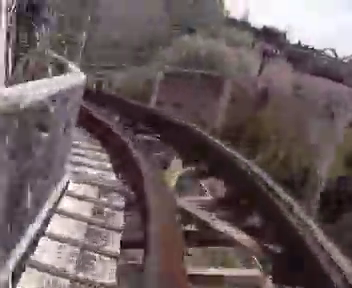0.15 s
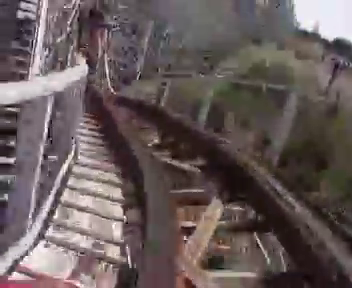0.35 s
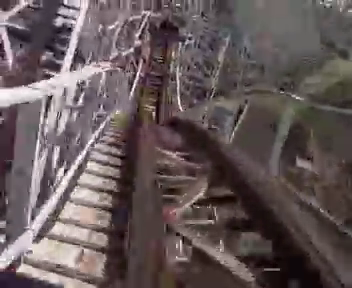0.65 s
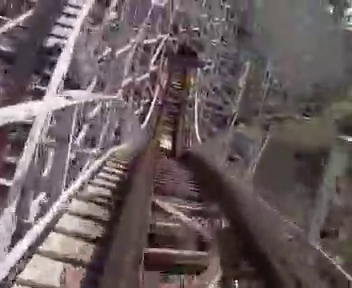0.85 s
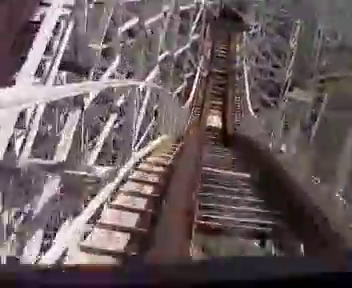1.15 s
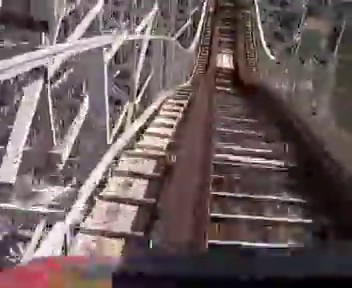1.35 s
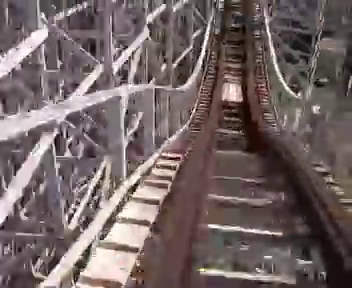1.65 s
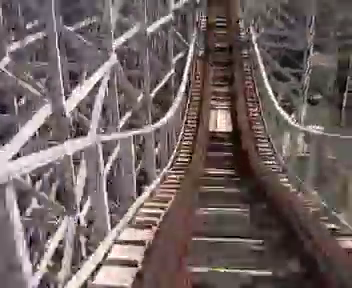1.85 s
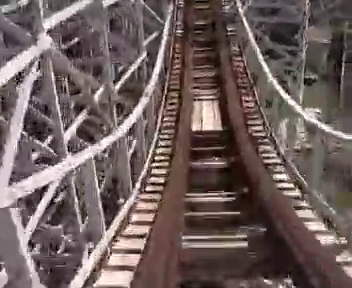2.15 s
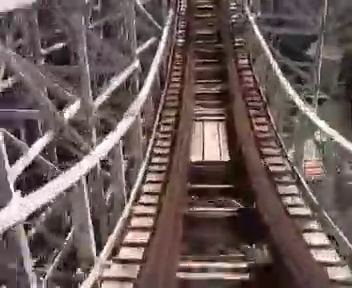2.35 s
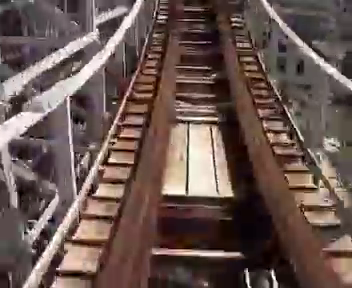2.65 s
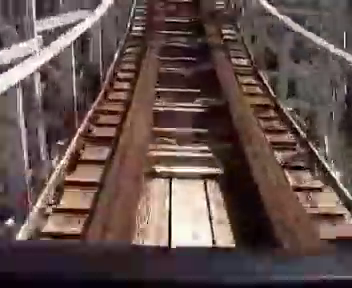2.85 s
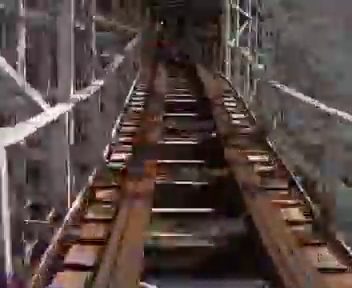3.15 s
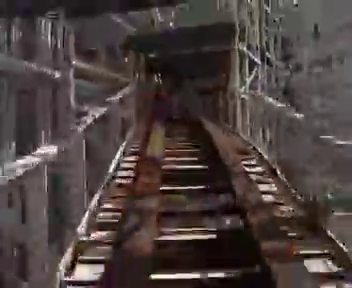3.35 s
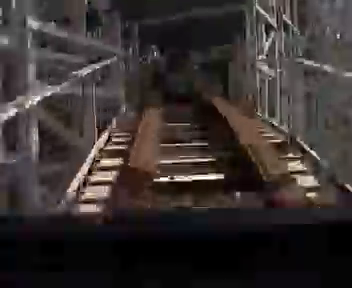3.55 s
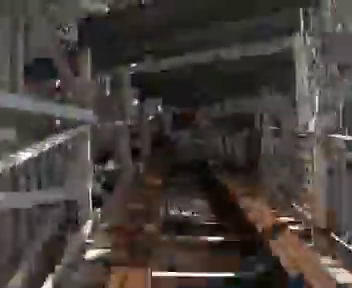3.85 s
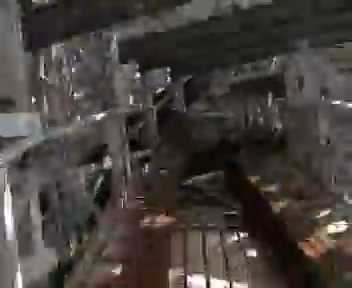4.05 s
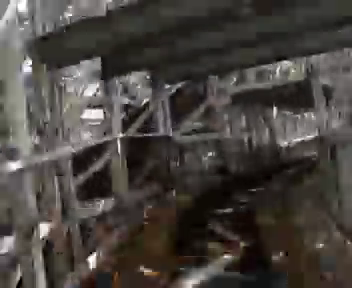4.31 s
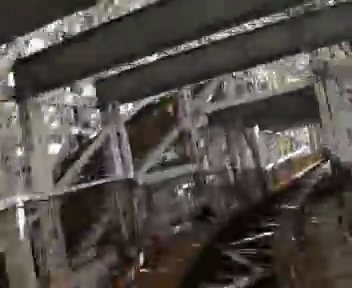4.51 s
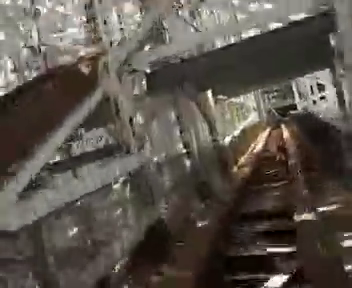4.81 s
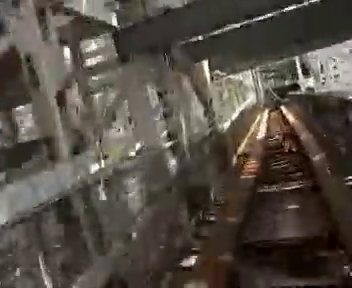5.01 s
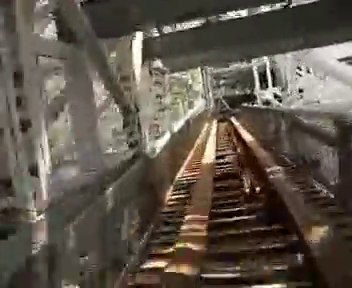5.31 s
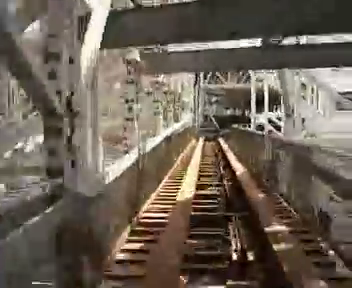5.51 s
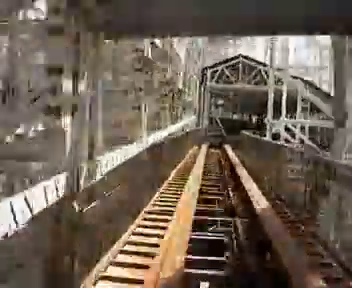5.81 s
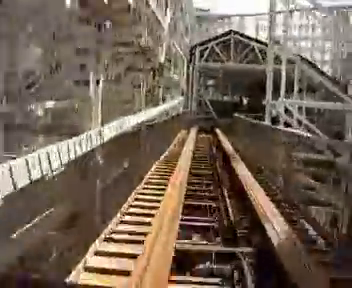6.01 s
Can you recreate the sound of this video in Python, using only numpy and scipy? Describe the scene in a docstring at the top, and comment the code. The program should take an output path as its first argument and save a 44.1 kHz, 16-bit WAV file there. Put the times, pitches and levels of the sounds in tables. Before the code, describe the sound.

A wooden roller coaster heard from the front seat: loud rumbling, dense rattling and hard clacks, then wind slaps and a ringing steel wheel.

```python
"""Wooden coaster, front seat

Riding fast through a dip and into the timber structure, every source close to a small, dull microphone.
Bumps in the track, as filtered noise bursts, make the car body boom and the chassis thud. Loose fittings
rattle (coloured random contacts) and clack (ringing chatter); a steel wheel rings as one narrow resonance.
Gliding noise bands give flange rubs in the bend and one gust's hoarse edge. Gusts flutter as shaped noise,
wind slaps are short pressure swings, sharp cracks single pulses. The level dips briefly after two gusts."""
import sys
import numpy as np
from scipy import signal
from scipy.fft import rfft, irfft
from scipy.io import wavfile
from scipy.ndimage import uniform_filter1d, map_coordinates

SR = 44100
rng = np.random.default_rng(int(sys.argv[2]) if len(sys.argv) > 2 else 0)


def inscribe(sig):
    """Save sig as 16-bit PCM at rate SR to the path in sys.argv[1].

    A 1-D sig is mono; a 2-D sig holds one channel per row.
    Samples are clipped to [-1, 1] before scaling.
    """
    pcm = np.round(np.clip(np.atleast_2d(sig).T, -1, 1) * 32767)
    wavfile.write(sys.argv[1], SR, pcm.astype(np.int16))


N = 272097


def from_db(db):
    """Decibels to amplitude gain."""
    return 10 ** (np.asarray(db) / 20)


def rms_one(x):
    """Scale to rms 1."""
    return x / np.sqrt(np.mean(x ** 2) + 1e-20)


def in_time(rows):
    """Draw each level column of a table as straight lines, sample by sample."""
    times_s, *columns = np.transpose(rows)
    t = np.arange(N) / SR
    return [np.interp(t, times_s, column) for column in columns]


def add(out, start_s, sound):
    """Mix a short sound in at a time."""
    at = max(round(start_s * SR), 0)
    out[at:at + len(sound)] += sound[:N - at]


def colour(x, spectrum):
    """Filter a signal by a spectrum drawn over log frequency; rms 1."""
    hz, db = np.transpose(spectrum)
    bin_hz = np.arange(N // 2 + 1) * SR / N
    gain = from_db(np.interp(np.log(bin_hz + 1), np.log(hz), db))
    return rms_one(irfft(rfft(x) * gain, N))


def drift(knots_per_s):
    """A smooth random curve through chance knots; rms 1."""
    knots = rng.standard_normal(4000)
    position = np.arange(N) / SR * knots_per_s
    return rms_one(map_coordinates(knots, [position], order=3, mode="wrap"))


def resonate(x, hz, width_hz):
    """A two-pole resonance with gain 1 at its peak."""
    radius = np.exp(-np.pi * width_hz / SR)
    feed = np.array([1, 0, -1]) * (1 - radius ** 2) / 2
    feedback = [1, -2 * radius * np.cos(2 * np.pi * hz / SR), radius ** 2]
    return signal.lfilter(feed, feedback, x + 1e-18)


def even(x, size):
    """Hold a noise near rms 1 over a stretch of samples, leaving its fine grain."""
    power = uniform_filter1d(uniform_filter1d(x * x, size), size)
    return x / np.sqrt(np.maximum(power, 1e-12))


def modal(force, modes, damping):
    """A heavy body's modes answer a force with alternating signs, passing little treble."""
    low_pass = signal.butter(2, 1000, fs=SR, output="sos")
    force = signal.sosfilt(low_pass, force)
    out = np.zeros(len(force))
    for k, (hz, width_hz, db) in enumerate(modes):
        out += (-1) ** k * from_db(db) * resonate(force, hz, width_hz * damping)
    return out


def shove(modes, contact_s, damping):
    """A body's answer to one brief, rough shove; rms 1 over its first 35 ms."""
    t = np.arange(8192) / SR
    force = rng.standard_normal(len(t)) * np.exp(-t / contact_s)
    boom = modal(force, modes, damping)
    return boom / np.sqrt(np.mean(boom[t < .035] ** 2))


# resonances of the car body: f/Hz, width/Hz before the damping factor, relative level/dB
CAR_MODES = [(153, 16, -5.5), (209.5, 11.6, 5.5), (265, 26.3, -1), (321.3, 111, -10.5)]
# resonances of the chassis: f/Hz, width/Hz before the damping factor, relative level/dB
CHASSIS_MODES = [(87, 28.7, -3.5), (114, 20.4, 3.5)]
SWAYS_PER_S = 14  # chance knots in the level


def rumble(modes, level_db, damping, sway_db):
    """The uneven rail shakes a body all the time, swaying in level by chance."""
    shake = even(modal(rng.standard_normal(N), modes, damping), size=1800)
    return from_db(level_db + sway_db * drift(SWAYS_PER_S)) * shake


# spectrum of rolling noise and rushing air: f/Hz, relative density/dB per Hz
ROAR_SPECTRUM = [(150, -30.5), (280, -5), (380, 3), (520, -0.5), (700, -1), (880, -8), (1150, -10),
                 (1500, -8.5), (2000, -24), (3000, -49)]


def roar(level_db, lumpy_db):
    """Rolling noise and rushing air, torn into lumps by turbulence."""
    lumps = from_db(lumpy_db * drift(130))
    air = colour(rng.standard_normal(N), ROAR_SPECTRUM) * lumps
    return from_db(level_db) * even(air, size=1800)


# spectrum of timber and fittings: f/Hz, relative density/dB per Hz
RATTLE_SPECTRUM = [(450, -15), (800, -3), (1100, -2.5), (1400, -4), (1900, -3), (2400, -3), (3000, -8),
                   (3350, -12.5), (3650, -19), (4000, -27), (4400, -31), (4700, -26), (5200, -30.5)]


def rattle(level_db, per_s, spread_db, clump_db):
    """Thousands of small contacts in wheels, chains and bars, swelling in clumps."""
    sizes = from_db(spread_db * np.minimum(rng.exponential(1, N), 4))
    signs = rng.choice([-1, 1], N)
    hits = rng.random(N) < per_s / SR
    contacts = sizes * signs * hits * from_db(clump_db * drift(110))
    return from_db(level_db) * even(colour(contacts, RATTLE_SPECTRUM), size=2200)


# the steel wheel's ring under rolling, harder in the bend: t/s, level/dB above the rattle
WHEEL_RING = [(0, -24.5), (1.3, -6.5), (3.6, -10), (3.95, -4), (4.15, -4), (4.45, -3.5), (4.87, -2.5),
              (5.35, -4.5), (5.6, -8.5), (6.17, -10.5)]
# the wheel knocks against the rail: t/s, peak level/dB
WHEEL_KNOCKS = [(1.4565, -14), (2.752, -17), (3.015, -12), (3.705, -14), (3.8307, -7.5), (3.897, -6.5),
                (3.9716, -12), (4.42, -20), (4.6039, -9.5), (4.9, -15.5), (5.4615, -10.5), (5.7638, -10.5)]
WHEEL_HZ, ROLLING_WIDTH_HZ = 947, 24


def wheel(rattle_db, contact_s, knock_width_hz):
    """One steel mode sings faintly under rolling and rings out after each scraping knock."""
    ring_db, = in_time(WHEEL_RING)
    singing = even(resonate(rng.standard_normal(N), WHEEL_HZ, ROLLING_WIDTH_HZ), size=2200)
    out = from_db(rattle_db + ring_db) * singing
    t = np.arange(8192) / SR
    for s, db in WHEEL_KNOCKS:
        scrape = rng.standard_normal(len(t)) * np.exp(-t / contact_s)
        ring = resonate(scrape, WHEEL_HZ, knock_width_hz)
        add(out, s - .002, from_db(db) * ring / ring.max())
    return out


# loose fittings slam: t/s, peak level/dB, f/Hz, decay/s
CLACKS = [(0.004, -4, 1350, 0.0086), (0.126, -3.5, 2490, 0.0075), (0.188, -9.5, 1440, 0.029),
          (0.299, -7, 2970, 0.039), (0.411, -7, 1850, 0.015), (0.482, -6.5, 1890, 0.0086),
          (0.636, -11.5, 2270, 0.013), (0.693, -8.4, 1960, 0.032), (0.868, -10, 2210, 0.023),
          (0.998, -3, 2540, 0.0071), (1.062, -9, 1410, 0.02), (1.128, -7, 1960, 0.013),
          (1.256, -8.5, 1750, 0.024), (1.312, -6.4, 1760, 0.046), (1.594, -13, 2130, 0.019),
          (1.733, -6.5, 1850, 0.019), (1.819, -9.5, 1350, 0.012), (1.884, -13.5, 1710, 0.031),
          (1.951, -4.5, 2420, 0.0074), (2.028, -9.5, 1540, 0.019), (2.116, -11.8, 1970, 0.015),
          (2.196, -12, 1950, 0.012), (2.421, -7.5, 2400, 0.0072), (2.52, -11, 2100, 0.011),
          (2.756, -10.5, 1990, 0.026), (2.909, -7.9, 1470, 0.017), (3.012, -15.5, 2050, 0.038),
          (3.105, -8.5, 1900, 0.043), (3.272, -9.5, 2520, 0.018), (3.305, -16, 2180, 0.02),
          (3.722, -9.2, 1730, 0.0065), (3.897, -15, 2570, 0.012), (4.033, -8, 2500, 0.028),
          (4.187, -14.5, 1380, 0.013), (4.275, -20.5, 1950, 0.028), (4.604, -14.5, 1410, 0.012),
          (5.36, -11.5, 1380, 0.025), (5.458, -21, 1380, 0.0049), (5.635, -8.5, 1390, 0.037),
          (5.811, -5.5, 2160, 0.017)]


def clacks(rise_share, width_hz, ring_db):
    """A loose part slams and chatters around its own pitch; a longer chatter starts softer."""
    out, t = np.zeros(N), np.arange(6144) / SR
    chatter = even(colour(rng.standard_normal(N), RATTLE_SPECTRUM), size=200)
    for s, db, hz, decay_s in CLACKS:
        start = rng.integers(N - len(t))
        rise_s = rise_share * decay_s
        envelope = (1 - np.exp(-t / rise_s)) * np.exp(-t / decay_s)
        burst = chatter[start:start + len(t)] * envelope
        clack = burst + from_db(ring_db) * resonate(burst, hz, width_hz)
        add(out, s - rise_s, from_db(db) * clack / np.abs(clack).max())
    return out


# the car drops over a bump in the track: t/s, body boom level/dB, chassis thud level/dB
BUMPS = [(0.128, -17, -32), (0.296, -21, -19.5), (0.381, -16, -28), (0.509, -23, -32.5),
         (0.635, -15, -22.2), (0.835, -15.5, -31), (0.912, -15, -18.5), (1.105, -27, -20),
         (1.176, -27, -21), (1.273, -16.5, -20), (1.495, -20, -20.5), (1.615, -17.5, -30),
         (1.832, -18, -33), (1.946, -22, -35.7), (2.032, -12.5, -30), (2.206, -12.5, -23),
         (2.378, -18.5, -34.5), (2.486, -16.5, -28), (2.695, -15.5, -30), (2.796, -18, -25),
         (3.079, -17.5, -36), (3.118, -20, -19.5), (3.179, -13.0, -37), (3.273, -18, -18.8),
         (3.586, -23, -23.5), (3.721, -20.5, -19.5), (3.801, -20.5, -30), (4.037, -21, -26.5),
         (4.259, -21, -38.3), (4.59, -15, -25), (4.751, -15, -25), (4.991, -26.5, -23), (5.112, -21, -27),
         (5.263, -25, -25), (5.356, -20, -31), (5.792, -25, -19.5), (6.033, -18, -31)]


def bumps():
    """Each bump sets the car body booming and the chassis thudding under it."""
    out = np.zeros(N)
    for s, boom_db, thud_db in BUMPS:
        boom = shove(CAR_MODES, contact_s=0.012, damping=1.37)
        thud = shove(CHASSIS_MODES, contact_s=0.0092, damping=1.0)
        add(out, s - .004, from_db(boom_db) * boom)
        add(out, s - .008, from_db(thud_db) * thud)
    return out


# sharp cracks from the overloaded microphone: t/s, peak level/dB
CRACKS = [(.127, -23), (3.106, -12), (3.4114, -8.5), (4.19, -25), (4.29, -24), (5.183, -10)]
CRACK_HZ, CRACK_WIDTH_HZ = 3250, 370


def cracks():
    """A single sharp pulse through the microphone's upper resonance."""
    out = np.zeros(N)
    crack = resonate(signal.unit_impulse(256), CRACK_HZ, CRACK_WIDTH_HZ)
    for s, db in CRACKS:
        add(out, s, from_db(db) * crack / crack.max())
    return out


# the din dips briefly between shakes: t/s, depth of the level/dB
LULLS = [(.465, 4), (.96, 2), (1.03, 4.5), (1.678, 1.5), (1.989, 5), (2.09, 3.5), (2.58, 6.5), (2.962, 5),
         (3.241, 5), (4.16, 4), (5.21, 4.5), (5.74, 5.5)]
LULL_S = .025  # from the deepest point to 1/e of the depth


def lulls():
    """How far the steady din sinks in its brief, bell-shaped dips, in dB."""
    t = np.arange(N) / SR
    return sum(depth_db * np.exp(-((t - s) / LULL_S) ** 2) for s, depth_db in LULLS)


# gusts swell and break off: t/s at the height, level/dB, swell/s, fade/s
GUSTS = [(1.82, -20, 0.1, 0.023), (2.895, -18, .04, 0.022), (3.406, -20.5, 0.037, 0.0087),
         (4.125, -14.5, .1, 0.021), (4.19, -16.5, .04, 0.019), (5.135, -16.5, 0.055, 0.034),
         (5.63, -22.5, .06, .05), (5.94, -19, 0.022, .04)]
# spectrum of wind on the microphone: f/Hz, relative density/dB per Hz
GUST_SPECTRUM = [(150, -33), (300, 5), (460, 4.5), (700, 0.5), (950, 2), (1400, -10), (2500, -35)]


def gusts(lumpy_db):
    """Air tears across the microphone in a fast, ragged flutter; each gust swells and breaks off."""
    t = np.arange(N) / SR
    air = colour(rng.standard_normal(N), GUST_SPECTRUM) * from_db(lumpy_db * drift(200))
    flutter = even(air, size=1200)
    strength = np.zeros(N)
    for s, db, swell_s, fade_s in GUSTS:
        side_s = np.where(t < s, swell_s, fade_s)
        strength += from_db(db) * np.exp(-((t - s) / side_s) ** 2)
    return flutter * strength


# wind slaps the microphone: t/s, level/dB of the swing, f/Hz
BUFFETS = [(3.359, -6.5, 380), (3.4105, -2, 565), (3.412, 3, 780), (4.077, -2, 700), (4.111, -6.5, 665),
           (4.135, -10, 534), (4.189, -3, 483), (4.213, -13, 514), (4.227, -10, 584), (4.759, -10.5, 221),
           (5.028, -9, 625), (5.044, -5.5, 537), (5.183, 0, 890)]


def buffets(cycles):
    """An eddy hits the microphone: a pressure swing of a cycle or two."""
    out, t = np.zeros(N), np.arange(-512, 512) / SR
    for s, db, hz in BUFFETS:
        wave = np.sin(2 * np.pi * (hz * t + rng.random()))
        swing = wave * np.exp(-(hz * t / cycles) ** 2)
        add(out, s + t[0], from_db(db) * swing)
    return out


# hoarse noise bands: flange rubs in the bend, and at 5.06-5.23 s a gust's hoarse edge:
# start t/s, end t/s, start f/Hz, end f/Hz, level/dB at the height
HOARSE_BANDS = [(3.8, 4.13, 2370, 2600, -29), (5.08, 5.21, 660, 680, -20.5),
                (5.06, 5.23, 1350, 1380, -28.5), (5.27, 5.42, 610, 620, -27), (5.45, 5.79, 615, 640, -23),
                (5.25, 6.0, 1370, 1390, -31)]


def hoarse_band(band, knots_per_s, arch):
    """A narrow band of noise, a tone of randomly drifting strength and phase, glides, swells and fades."""
    start_s, end_s, start_hz, end_hz, db = band
    progress = np.clip((np.arange(N) / SR - start_s) / (end_s - start_s), 0, 1)
    glide_hz = start_hz + (end_hz - start_hz) * progress
    phase = 2 * np.pi * np.cumsum(glide_hz) / SR
    hoarse = drift(knots_per_s) * np.sin(phase) + drift(knots_per_s) * np.cos(phase)
    swell = np.abs(np.sin(np.pi * progress)) ** arch
    return from_db(db) * swell * even(hoarse, size=1500)


# steady levels along the run, before the lulls: t/s, body boom level/dB, roar level/dB, rattle level/dB
RIDE = [(0.0, -19, -25.5, -21.5), (1.25, -20, -25, -22.5), (1.42, -25, -25, -24.5),
        (1.78, -18.5, -25.9, -22.5), (2.1, -21, -25.5, -24.5), (2.58, -20.5, -27.5, -25.4),
        (2.8, -17.5, -27, -21), (3.38, -22.5, -25, -26.5), (3.44, -33, -25.5, -37.5),
        (3.54, -34, -30, -30.5), (3.65, -27, -22, -20.5), (4.06, -18.5, -20, -22.5),
        (4.2, -26, -25.5, -31.5), (4.37, -33, -37, -34.5), (4.55, -21.5, -23.5, -23.5),
        (4.83, -24.3, -29, -29), (4.98, -21.2, -22.5, -21.9), (5.24, -24.0, -22.5, -23.4),
        (5.62, -19.5, -22.5, -21.5), (6.17, -20, -24.5, -21.5)]
SHUDDER_DB = -8  # chassis shudder against the body boom


def scene():
    """Car, fittings, steel and air, all close to the microphone."""
    boom_db, roar_db, rattle_db = in_time(RIDE) - lulls()
    car = rumble(CAR_MODES, boom_db, damping=0.9, sway_db=.6) + bumps()
    car += rumble(CHASSIS_MODES, boom_db + SHUDDER_DB, damping=1.3, sway_db=1.7)
    fittings = rattle(rattle_db, per_s=2200, spread_db=0.1, clump_db=1.6)
    fittings += clacks(rise_share=.09, width_hz=130, ring_db=-0.5)
    steel = wheel(rattle_db, contact_s=0.0061, knock_width_hz=18.4)
    hoarse = sum(hoarse_band(band, knots_per_s=105, arch=0.5) for band in HOARSE_BANDS)
    air = roar(roar_db, lumpy_db=2.0) + gusts(lumpy_db=5.5)
    air += buffets(cycles=0.95) + cracks()
    return (car + fittings + steel + hoarse + air)[None]


MIC_TOP_HZ, CUTOFF_HZ = 5330, 15800  # dull microphone's stop band edge, recorder's upper limit
CEILING, FIZZ_DB = .76, -33  # rounding level of the peaks, gain of the fizz
BIAS = -.148  # the recorder's signal rests a little below zero


def record(dry):
    """A wind filter cuts bass, peaks are rounded, treble is cut; a faint fizz rides on bright sounds."""
    wind_filter = signal.butter(4, 68, "high", fs=SR, output="sos")
    mic_top = signal.cheby2(12, 60, MIC_TOP_HZ, fs=SR, output="sos")
    fizz_band = signal.butter(3, 7200, "high", fs=SR, output="sos")
    cutoff = signal.ellip(10, .1, 80, CUTOFF_HZ, fs=SR, output="sos")
    x = signal.sosfilt(wind_filter, dry)
    x = CEILING * np.tanh(x / CEILING)
    x = signal.sosfilt(mic_top, x)
    # noise scaled by the signal's slope, so fast-moving sounds fizz most
    fizz = signal.sosfilt(fizz_band, np.gradient(x, axis=1) * rng.standard_normal(N))
    return BIAS + signal.sosfilt(cutoff, x + from_db(FIZZ_DB) * fizz)


dry = scene()
out = record(dry)
inscribe(out)
```